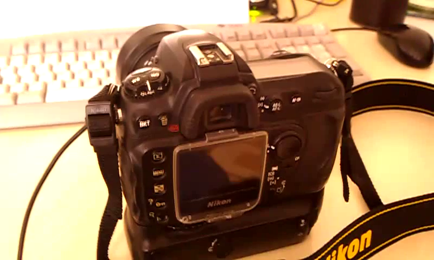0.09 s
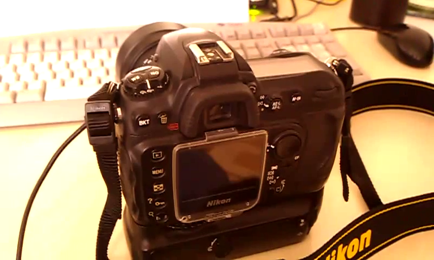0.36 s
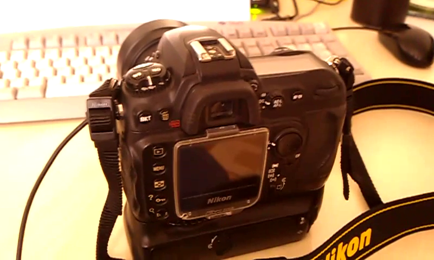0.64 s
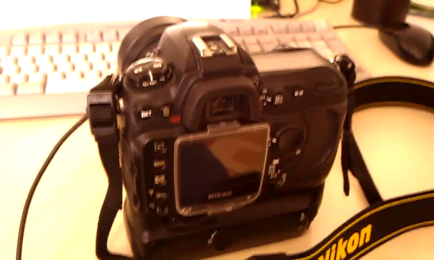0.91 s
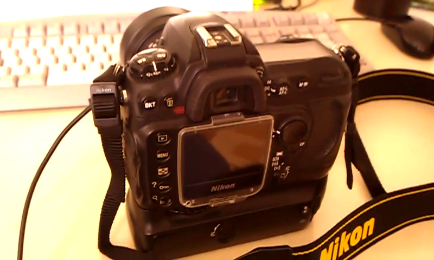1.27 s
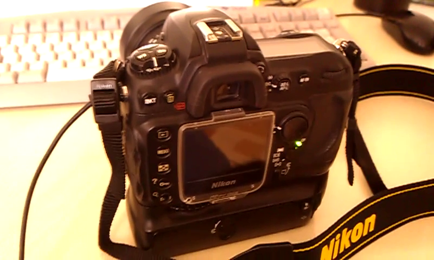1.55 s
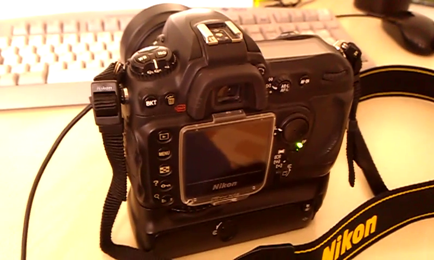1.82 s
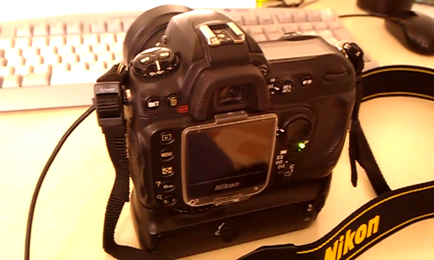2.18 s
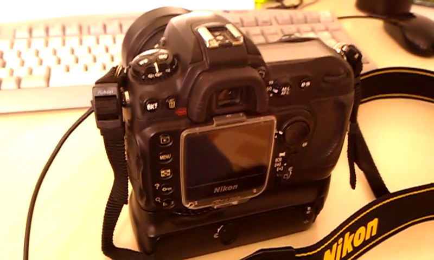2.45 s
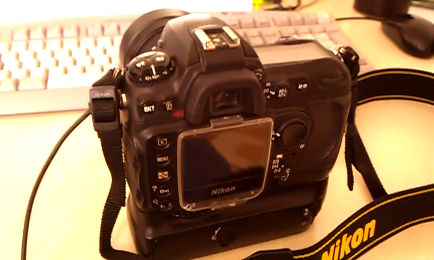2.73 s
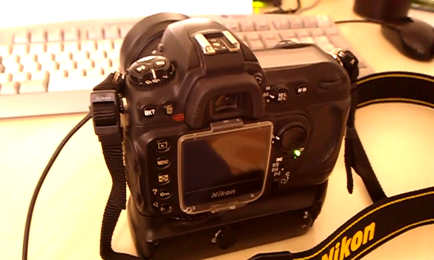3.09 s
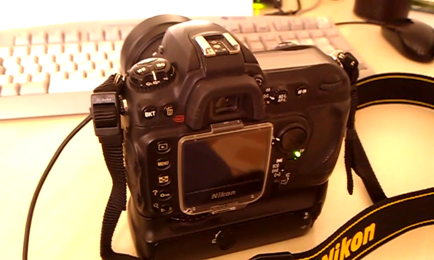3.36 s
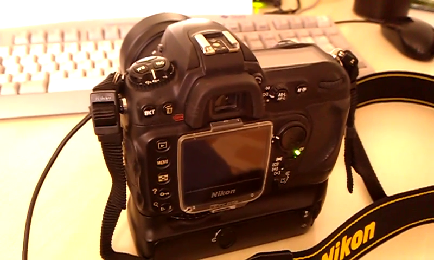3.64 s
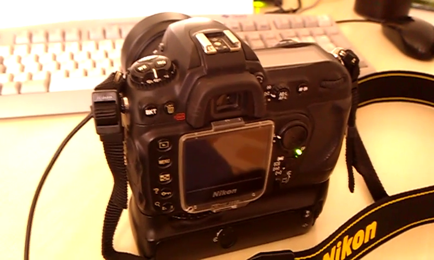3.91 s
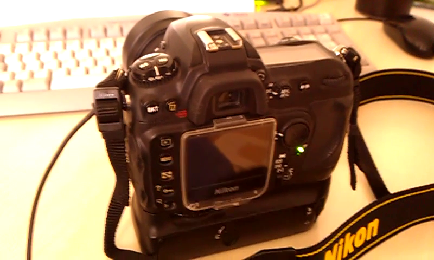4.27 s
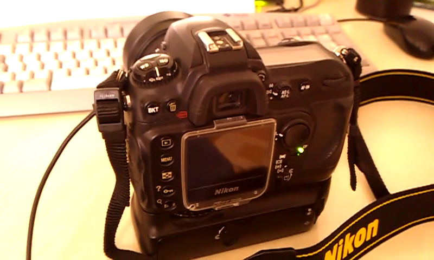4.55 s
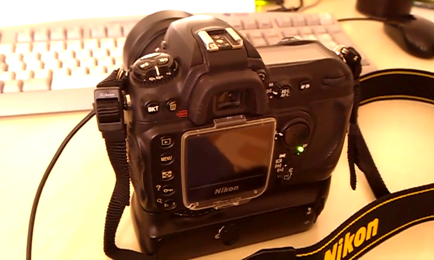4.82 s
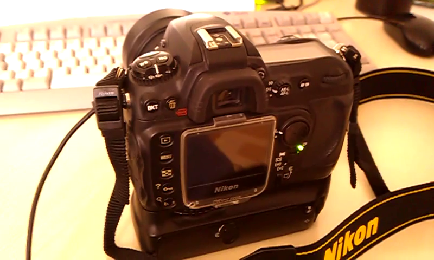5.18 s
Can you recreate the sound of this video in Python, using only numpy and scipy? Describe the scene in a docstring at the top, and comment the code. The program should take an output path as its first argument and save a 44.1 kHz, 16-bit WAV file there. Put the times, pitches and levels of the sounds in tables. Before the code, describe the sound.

A quiet room fades in at about 0.7 seconds, with low hiss and a faint, steady fan tone. Close by, a camera's controls make three small clicks, at about 0.7, 1.0 and 1.5 seconds, the second the clearest. At 1.7 seconds the lens slides into focus with a brief, soft, dry swish. Just before 2 seconds a sharp tick starts a much louder continuous burst: 27 shots, evenly spaced at five a second. Each shot is a bright, crisp clatter of the mirror slapping up, the shutter running and the mirror dropping, with a short rattling motor wind and a low thrum of the body on the desk. At about 4.2 seconds the desk takes one soft, dull knock beneath the clatter. The rhythm holds until the last shot at about 7.2 seconds. The sound is close and dry, with very little echo.

```python
"""A few small clicks and a lens sliding into focus, then a reflex camera fires five frames a second.
Each of the 27 frames plays one mechanical cycle: a latch lets go, the mirror slaps up, the curtains
run, the mirror clatters down and the motor winds on while the body thrums on the desk.
The desk takes one soft knock mid-burst. Behind it all, a quiet room: hiss and a faint fan tone."""
import sys
import numpy as np
from scipy import signal
from scipy.fft import rfft, irfft, next_fast_len
from scipy.io import wavfile
from scipy.ndimage import uniform_filter1d

SR = 44100
rng = np.random.default_rng(int(sys.argv[2]) if len(sys.argv) > 2 else 0)


def to_wav(s):
    """Save 16-bit WAV."""
    ch = np.atleast_2d(s).T  # columns
    pcm = np.round(np.clip(ch, -1, 1) * 32767)  # PCM
    wavfile.write(sys.argv[1], SR, pcm.astype(np.int16))


N = 326340
TIME_S = np.arange(N) / SR
FRAME_COUNT, LEAD_S, CYCLE_LENGTH_S = 27, .012, .3
CYCLE_S = np.arange(int(CYCLE_LENGTH_S * SR)) / SR - LEAD_S   # 0 at the mirror slap

# camera case resonances: centre_hz, width_hz, lift_db
CASE_RESONANCES = [(1156, 47, 3), (1693, 75, 5), (2320, 20, 0.5), (2986, 100, 3), (3230, 36, 3),
                   (3560, 73, 4.5), (3900, 96, 3), (5630, 240, 3.5), (5860, 99, 2)]


def burst(start_s=1.9505, first_gap_s=.2037, period_s=.200744, slowing_s_per_frame=.000082):
    """One cycle a frame. The first, from rest, takes longer; then the pace slackens as the battery sags."""
    frame = np.arange(FRAME_COUNT - 1)
    gaps_s = np.where(frame == 0, first_gap_s, period_s + slowing_s_per_frame * frame)
    slaps_s = start_s + np.append(0, np.cumsum(gaps_s))
    out = np.zeros(N + len(CYCLE_S))
    for slap_s, cycle in zip(slaps_s, contacts() + mirror() + winding()):
        start = int((slap_s - LEAD_S) * SR)
        out[start:start + len(cycle)] += cycle
    return out[:N]


def contacts(wander_ratio=.003):
    """Latch, mirror, bounces and curtains each crack through the case; late ones wander more in time."""
    # hard contacts in one cycle: after_slap_s, level_db, t60_s
    hits = [(-.0072, -20, 0.016), (.0001, -15, 0.0091), (.0011, -13, 0.017), (.0035, -13.5, 0.01),
            (.0062, -24.5, 0.0048), (0.0133, -25.5, 0.0069), (0.0269, -24, 0.0074), (.038, -24, 0.0081),
            (0.047, -16.5, 0.01), (.05, -19, 0.017), (0.0832, -18, 0.013), (0.0862, -19.5, 0.039),
            (.0904, -15.5, 0.021), (0.1256, -21, 0.021), (.163, -34, 0.017), (0.1816, -38, 0.0089)]
    # crack spectrum: freq_hz, gain_db
    crack_spectrum = [(60, -54), (500, -35.5), (800, -12.5), (1700, -13.5), (3200, -2), (4500, -5.5),
                      (5700, 0.5), (7400, -2), (8400, -11.5), (9600, -15), (11000, -22), (13000, -29.5),
                      (16500, -17.5), (18000, -27)]
    power = 0
    for at_s, level_db, t60_s in hits:
        late_s = wander_ratio * at_s * rng.standard_normal((FRAME_COUNT, 1))
        power = power + (from_db(level_db) * decay(CYCLE_S - at_s - late_s, t60_s)) ** 2
    force = np.sqrt(power) * np.sign(roughness(alike=.88))
    return through(force, crack_spectrum, CASE_RESONANCES)


def mirror():
    """The mirror hits its upper stop and falls on the lower one; recoil bounces the body on the desk."""
    # upper stop modes: pitch_hz, gain_db, t60_s
    upper_modes = [(1110, -10.5, 0.027), (2214, -4.5, 0.024), (2740, -6, 0.035), (3222, 5, 0.028),
                   (3540, -4, 0.028), (4600, -8, .016), (5120, 2.5, 0.019), (5500, -3, 0.022),
                   (5890, -3, 0.017), (7100, -7, 0.013), (7280, 5, 0.016), (9500, -10, 0.02)]
    # lower stop and spring modes: pitch_hz, gain_db, t60_s
    lower_modes = [(1680, -11, 0.041), (2170, 0.5, 0.046), (2230, -11.5, 0.084), (3000, -4.5, 0.041),
                   (3475, 2, 0.053), (4100, -27, .04), (5130, 2.5, 0.07), (5205, 3, 0.047),
                   (5705, 4.5, 0.031), (6430, 3, 0.045), (7770, 1, 0.058), (7850, -25, .04)]
    # modes of the body on the desk: pitch_hz, gain_db, t60_s
    desk_modes = [(81, -19, 0.21), (162.3, 1, 0.41), (209, -3.5, 0.12)]
    up = struck(upper_modes, at_s=-.00021, level_db=-20,
                spread_s=.000809, rise_s=.00093, vary_db=.9, wander_s=.00002)
    down = struck(lower_modes, at_s=.085, level_db=-21,
                  spread_s=.004, rise_s=.0014, vary_db=1, wander_s=.0001)
    bounce = struck(desk_modes, at_s=.049, level_db=-39,
                    spread_s=.00058, rise_s=.006, vary_db=.7, wander_s=.00018)
    return up + down + bounce


def struck(modes, at_s, level_db, spread_s, rise_s, vary_db, wander_s):
    """Ringing, frames x cycle: the blow reaches each mode a little late; force and timing vary by frame."""
    out = 0
    for pitch_hz, gain_db, t60_s in modes:
        late, force = rng.standard_normal((2, FRAME_COUNT, 1))
        t = CYCLE_S - at_s - spread_s * rng.random() - wander_s * late
        envelope = from_db(level_db + gain_db + vary_db * force) * swell(t, rise_s) * decay(t, t60_s)
        out = out + envelope * np.sin(2 * np.pi * pitch_hz * t)
    return out


def winding(tooth_hz=490, tooth_db=3, grain_db=2.5, loaded_until_s=.074):
    """Levers rattle, gears growl, the body thrums; teeth pulse while the motor pulls on the springs."""
    # lever rattle spectrum: freq_hz, gain_db
    lever_spectrum = [(100, -61), (1000, -25), (1900, -8.5), (2300, -2), (2700, -4.5), (3400, 2.5),
                      (4200, 2), (4800, -2), (5700, 2), (6500, -3), (7500, -4), (8700, -13.5),
                      (13000, -32.5), (16500, -24)]
    # gear growl spectrum: freq_hz, gain_db
    gear_spectrum = [(60, -32), (300, -18.5), (560, -15), (680, -8.5), (800, -1), (1000, -1.5), (1170, 1.5),
                     (1400, -4), (1750, -3), (2400, -4.5), (4000, -30), (9000, -55)]
    # body thrum spectrum: freq_hz, gain_db
    thrum_spectrum = [(25, -20), (50, -27), (80, -3), (125, -6.5), (160, 3), (200, 1), (240, -4.5),
                      (300, -7), (350, -4.5), (400, -4), (480, -6), (900, -27.5), (4000, -103)]
    lever_gain = motor_load(level_db=-24, full_s=.077, hold_s=.035, rise_db_per_s=58, fall_db_per_s=114)
    gear_gain = motor_load(level_db=-36, full_s=.047, hold_s=.069, rise_db_per_s=219, fall_db_per_s=156)
    thrum_gain = motor_load(level_db=-45, full_s=.079, hold_s=.018, rise_db_per_s=98, fall_db_per_s=121)
    teeth = from_db(tooth_db * np.cos(2 * np.pi * tooth_hz * CYCLE_S) * (CYCLE_S < loaded_until_s))
    drive = slack() * teeth
    grain = from_db(grain_db * through(roughness(alike=.73), [(60, 1), (600, 6), (2000, -25), (5000, -70)]))
    levers = through(lever_gain * drive * grain * roughness(alike=.53), lever_spectrum, CASE_RESONANCES)
    gears = through(gear_gain * drive * roughness(alike=.55), gear_spectrum, CASE_RESONANCES)
    thrum = thrum_gain * evened(through(roughness(alike=.79), thrum_spectrum), window_s=.019)
    return levers + gears + thrum


def motor_load(level_db, full_s, hold_s, rise_db_per_s, fall_db_per_s, on_s=-.007, brake_s=.194):
    """Gain that swells as the springs tension, holds, sinks as the motor coasts and dies as it brakes."""
    tension_db = -rise_db_per_s * np.maximum(full_s - CYCLE_S, 0)
    coast_db = -fall_db_per_s * np.maximum(CYCLE_S - full_s - hold_s, 0)
    brake = decay(np.maximum(CYCLE_S - brake_s, 0), t60_s=.047)
    return from_db(level_db + tension_db + coast_db) * (CYCLE_S > on_s) * brake


def slack(at_s=.0785, width_s=.0065, depth_db=6.5):
    """Gain dip: the gear train runs free while the mirror falls."""
    return from_db(-depth_db * np.exp(-((CYCLE_S - at_s) / width_s) ** 2))


def clicks(rise_s=.00021):
    """The controls, and last the release magnet, each ring a few modes for milliseconds."""
    # click modes: start_s, level_db, pitch_hz, t60_s
    click_modes = [(.7362, -40, 2010, 0.015), (0.7373, -34, 3700, 0.0054), (.7364, -29.5, 5500, 0.0037),
                   (0.988, -29.5, 2120, .011), (.9873, -20.5, 4300, 0.0056), (0.9872, -27.5, 5700, 0.0057),
                   (0.988, -23, 7560, .006), (1.4608, -28, 3250, 0.008), (1.4602, -35, 6200, .005),
                   (1.9401, -23, 2200, .006), (1.94, -4, 5300, 0.0041), (1.94, -4, 6840, 0.0055),
                   (1.9399, -23, 16000, .005)]
    out = np.zeros(N)
    for start_s, level_db, pitch_hz, t60_s in click_modes:
        envelope = from_db(level_db) * swell(CYCLE_S, rise_s) * decay(np.maximum(CYCLE_S - rise_s, 0), t60_s)
        start = int((start_s - LEAD_S) * SR)
        out[start:start + len(CYCLE_S)] += envelope * np.sin(2 * np.pi * pitch_hz * CYCLE_S)
    return out


def lens(start_s=1.7, attack_s=.049, t60_s=.41, level_db=-38):
    """The focusing barrel slides with a dry swish: it gathers speed, then eases off."""
    # barrel friction spectrum: freq_hz, gain_db
    slide_spectrum = [(710, -42), (1200, -14), (1790, -12), (2000, -9), (2130, -8), (2820, -6), (3090, -2),
                      (3820, -6), (3930, -11), (5340, -8.5), (11000, -31), (14300, -61), (22000, -120)]
    t = TIME_S - start_s
    speed = ramp(t, attack_s) * decay(np.maximum(t - attack_s, 0), t60_s)
    return from_db(level_db) * speed * through(rng.standard_normal(N), slide_spectrum)


def desk_knock(start_s=4.155, level_db=-37, pitch_hz=68, t60_s=.065):
    """One dull, quickly damped thud of the desk top."""
    t = TIME_S - start_s
    return from_db(level_db) * np.sin(2 * np.pi * pitch_hz * t) * decay(t, t60_s)


def reflections(x, wet_db=-20, t60_s=.13, delay_s=.0036):
    """Faint, dull returns from desk and walls."""
    tail = rng.standard_normal(len(CYCLE_S)) * decay(CYCLE_S + LEAD_S - delay_s, t60_s)
    tail = through(tail, [(80, 11.5), (4000, 6.5), (9000, -9), (17000, -31)])
    return from_db(wet_db) * signal.fftconvolve(x, tail / np.linalg.norm(tail))[:N]


def room_tone(hiss_db=-52.5, fan_hz=640, fan_db=-66.5, start_s=.67, fade_s=.3):
    """Room hiss and a faint fan tone, fading in together."""
    # room hiss spectrum: freq_hz, gain_db
    hiss_spectrum = [(15, -47), (25, -16), (147, -3.5), (222, -4), (254, -5), (451, -6), (593, -7),
                     (643, -5.5), (1240, -8.5), (1460, -7), (1970, -12), (2320, -11), (4460, -13.5),
                     (10400, -16), (17000, -25.5)]
    hiss = from_db(hiss_db) * through(rng.standard_normal(N), hiss_spectrum)
    fan = from_db(fan_db) * np.sin(2 * np.pi * fan_hz * TIME_S)
    return ramp(TIME_S - start_s, fade_s) * (hiss + fan)


def roughness(alike):
    """Contact noise, frames x cycle. The same parts touch each frame: `alike` is the repeating power share."""
    common = rng.standard_normal(len(CYCLE_S))
    chance = rng.standard_normal((FRAME_COUNT, len(CYCLE_S)))
    return np.sqrt(alike) * common + np.sqrt(1 - alike) * chance


def through(x, spectrum, resonances=()):
    """A body as a causal filter, from (freq_hz, gain_db) points; keeps the power of white noise."""
    size = next_fast_len(2 * x.shape[-1])
    bins_hz = np.fft.rfftfreq(size, 1 / SR) + 1
    freq_hz, gain_db = np.transpose(spectrum)
    peaks_db = sum(lift_db / (1 + (2 * (bins_hz - centre_hz) / width_hz) ** 2)
                   for centre_hz, width_hz, lift_db in resonances)
    gain = from_db(np.interp(np.log(bins_hz), np.log(freq_hz), gain_db) + peaks_db)
    gain /= np.sqrt(np.mean(gain ** 2) + 1e-20)
    cepstrum = irfft(np.log(gain), size)
    cepstrum[1:size // 2] *= 2   # minimum phase: nothing rings before it is struck
    cepstrum[size // 2:] = 0
    return irfft(rfft(x, size) * np.exp(rfft(cepstrum)), size)[..., :x.shape[-1]]


def evened(x, window_s):
    """Noise divided by its running rms, to flatten chance swells."""
    size = int(window_s * SR)
    power = uniform_filter1d(uniform_filter1d(x ** 2, size, mode="wrap"), size, mode="wrap")
    return x / np.sqrt(power + 1e-6)


def decay(t, t60_s):
    """Sudden start at t = 0, then exponential fall."""
    return (t >= 0) * np.exp(-np.log(1000) * np.maximum(t, 0) / t60_s)


def swell(t, rise_s):
    """Smooth build-up of a contact, 0 to 1."""
    return np.sin(np.pi / 2 * ramp(t, rise_s)) ** 2


def ramp(t, length_s):
    return np.clip(t / length_s, 0, 1)


def from_db(db):
    return 10 ** (np.asarray(db) / 20)


def scene():
    """Camera and desk close by, their reflections and the quiet room; mono."""
    direct = burst() + clicks() + lens() + desk_knock()
    return (direct + reflections(direct) + room_tone())[None]


def record(dry):
    """Soft peak limiting, then a steep low-pass."""
    ceiling, cutoff_hz = .85, 17500
    rounded = dry / (1 + (dry / ceiling) ** 4) ** .25
    return signal.sosfilt(signal.ellip(10, .2, 80, cutoff_hz, fs=SR, output="sos"), rounded)


dry = scene()
out = record(dry)
to_wav(out)
```